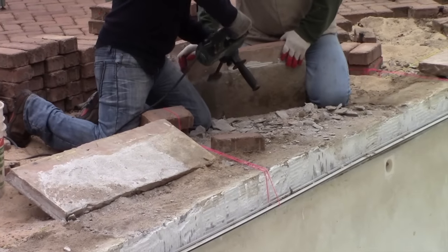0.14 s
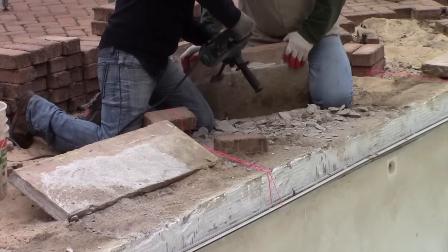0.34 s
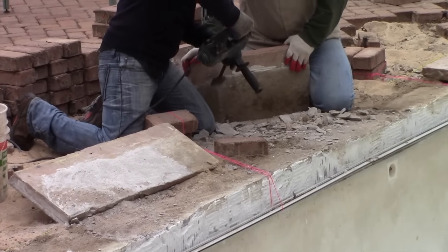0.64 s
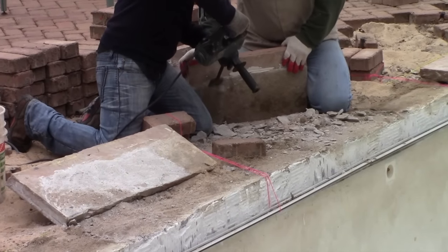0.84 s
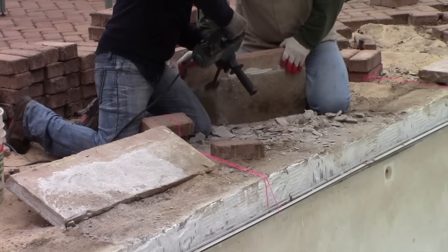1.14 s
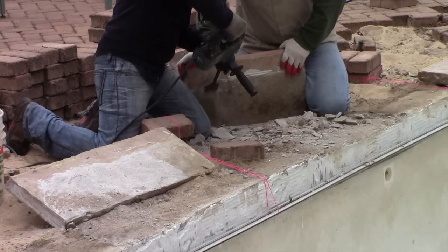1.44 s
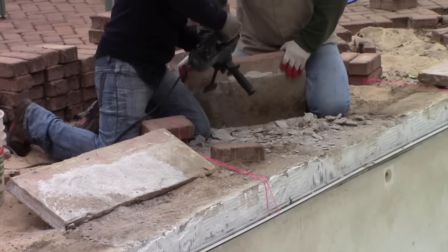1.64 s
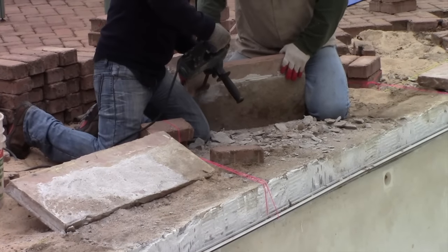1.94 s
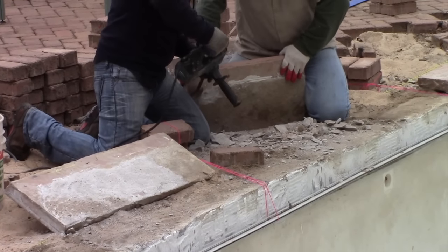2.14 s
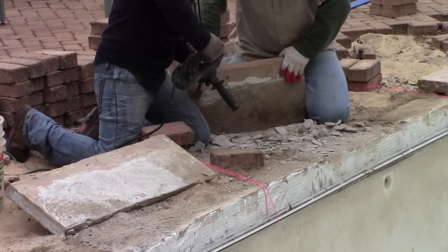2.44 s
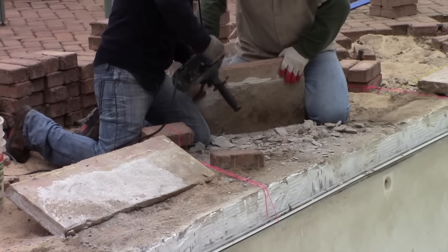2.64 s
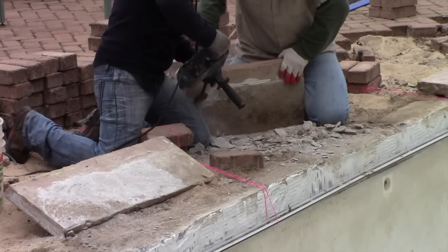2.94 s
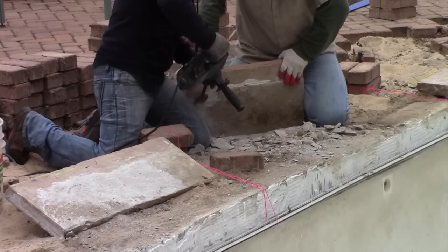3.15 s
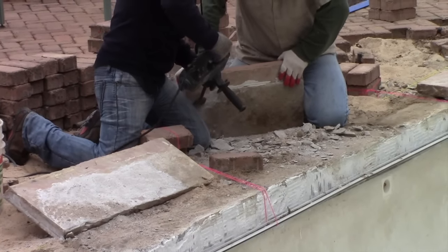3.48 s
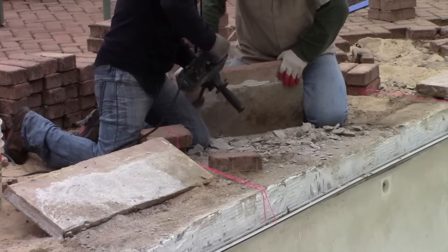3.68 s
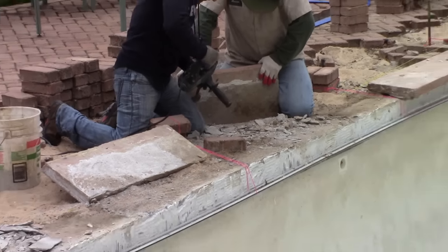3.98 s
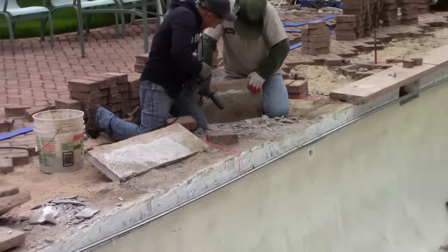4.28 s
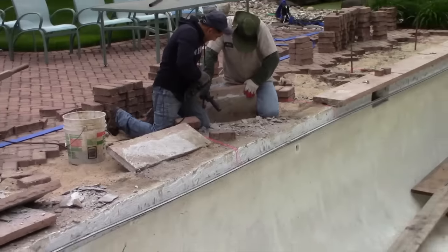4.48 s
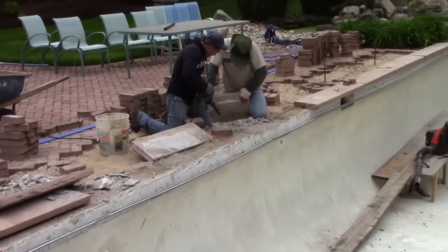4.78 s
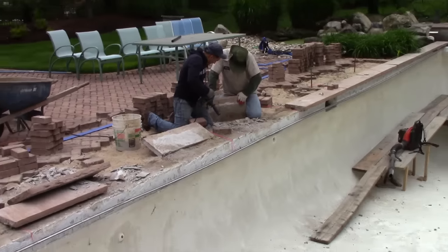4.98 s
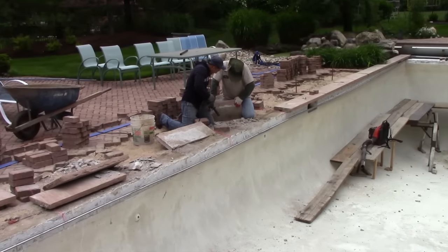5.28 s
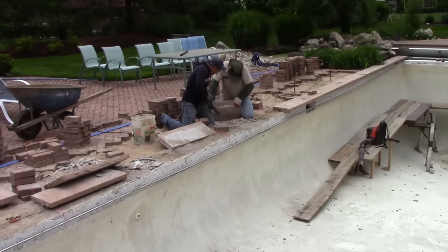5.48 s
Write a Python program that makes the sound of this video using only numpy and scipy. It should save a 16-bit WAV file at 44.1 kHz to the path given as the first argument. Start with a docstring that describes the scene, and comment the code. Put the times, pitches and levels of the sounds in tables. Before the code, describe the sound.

A dense, buzzing machine-gun rattle of steel chisel on stone, with bright gritty cracking and ticking flakes. It stops twice, each time leaving the chisel to clank and the fan and gears to whir softly before hammering restarts. Nearby stereo perspective, fairly dry open air with brief wall reflections and faint low air rumble.

```python
"""An electric chipping hammer knocks old concrete off a stone slab in three bursts, outdoors by an empty pool.
Each turn of the crank throws one blow: filtered clicks and noise make the housing knock, the stone ring,
the concrete crack and the steel chisel sing, and flakes tick on the paving.
Between bursts the tool is lifted: the chisel clangs loose, then only the fan and gears run on, as shaped noise.
Brick and pool walls add a short echo, over a faint rumble of outdoor air."""
import sys
import numpy as np
from scipy import signal
from scipy.fft import rfft, irfft
from scipy.io import wavfile
from scipy.ndimage import uniform_filter1d

SR = 44100
rng = np.random.default_rng(int(sys.argv[2]) if len(sys.argv) > 2 else 0)


def inscribe(sig):
    """Save sig as 16-bit PCM at rate SR to the path in sys.argv[1].

    A 1-D sig is mono; a 2-D sig holds one channel per row.
    Samples are clipped to [-1, 1] before scaling.
    """
    pcm = np.round(np.clip(np.atleast_2d(sig).T, -1, 1) * 32767)
    wavfile.write(sys.argv[1], SR, pcm.astype(np.int16))


N = 247838  # length in samples
TIME = np.arange(N) / SR  # seconds
TAPS = 8192  # filter size in samples
HZ = np.fft.rfftfreq(TAPS, 1 / SR)  # the frequencies at which filters are drawn
EDGE_HZ = 16100  # upper edge of the whole sound

# Bursts of hammering. Each row: start in seconds, racing above working speed in blows per second,
# pressure at the start (0-1), then the seconds at which the tool is fully pressed, the chisel seated,
# and the worker starts to ease off.
BURSTS = [(.009, 0, .68, .27, 0, 1.545), (2.3949, 3.87, 0, 2.535, 2.44, 4.64),
          (5.2441, 7.52, .2, 5.42, 5.50, 6)]
WORK_PER_S, SETTLE_S = 68.68, .27  # working speed in blows per second; racing dies away at this pace
IDLE_PER_S, COAST_S = 63, .17  # lifted, the crank slows to this many turns per second within this time
# The motor bogs down or speeds up for a moment. Each row: middle in seconds, length in seconds,
# change in blows per second.
SURGES = [(.689, .4, -.56), (5.03, .28, 6.5)]
# The chisel seats, works loose, then is lifted, in seconds; the last number curves how the worker leans in.
SEAT_S, LOOSEN_S, LIFT_S, LEAN_POWER = 0.059, .08, 0.05, 0.81
SHIFT_S = 0.11  # one bite gives way to the next over this time

# A barely touching tip. The numbers: levels in dB of knock, stone, concrete, lower and upper chisel mode,
# before each part's own trim.
TOUCH_DB = [-45.5, -45.5, -55, -77, -55]
# What a slack chisel adds, in dB, to those same five parts.
LOOSE_DB = [-1, -3.5, 1.5, 5, 2]

# Tone of the housing knock. Each row: frequency in Hz, relative level in dB.
KNOCK = [(90, -63), (140, -28), (206, -9), (272, -0.5), (420, -1), (560, -2), (800, -1.5), (1050, -14.5),
         (1600, -27)]
# Tone of the ringing stone. Each row: frequency in Hz, relative level in dB.
STONE = [(150, -32.5), (600, -36), (1100, -7.5), (1700, -2), (2600, 2), (4100, -0.5), (4800, -6),
         (6000, -5.5), (9000, -27.5)]
# Tone of the cracking concrete. Each row: frequency in Hz, relative level in dB.
CRACK = [(400, -86), (3000, -9), (6000, -5), (7200, 0), (8600, 0), (11000, -6.5), (12000, -9.5),
         (14300, -15), (16000, -28)]
# Lengthwise ringing modes of the steel chisel. Each row: frequency in Hz, width to each side in Hz.
CHISEL = [(9400, 184), (10300, 360)]

# Resonances of tool and slab for each kind of bite; widths below 90 Hz are widened to 90.
# Each row of these five: frequency in Hz, width in Hz, lift in dB.
FIRST_BITE = [(665, 110, 7.5), (940, 80, 11), (2100, 123, 15.5), (2360, 120, 2), (2976, 250, 12.5),
              (3860, 160, 8), (5200, 780, 6), (7950, 860, 7.5)]
SECOND_BITE = [(690, 53, 4.8), (990, 80, 8), (2081, 52, 13.6), (2996, 340, 10.9), (4080, 740, 5.5)]
DEEP_BITE = [(270, 84, 3.6), (733, 89, 17), (1070, 220, 11), (1520, 180, 5.6), (2300, 350, 4.7),
             (3000, 290, 5.3), (6780, 85, 11), (7600, 78, 2.7)]
EDGE_BITE = [(741.3, 87, 15.8), (2520, 65, 3.9), (2960, 160, 7.8), (4000, 64, 3.8), (5230, 136, 13.3),
             (6890, 56, 9), (8050, 420, 7.9)]
TIP_BITE = [(740.6, 87, 16), (965, 80, 6), (2950, 150, 10.8), (4570, 86, 13), (6870, 56, 12),
            (7100, 120, 3.1)]

# The tool as the two microphone ports hear it, in three postures.
# Each row of these three: frequency in Hz, left minus right level in dB.
EARLY_PORTS = [(200, -3.5), (380, -8), (700, 8), (1290, 20), (2380, 4.5), (4400, 0), (8000, 1)]
LATE_PORTS = [(200, -1.5), (380, -1), (700, -5), (1290, 10), (2380, 11.5), (4400, 1.5), (8000, 0)]
DEEP_PORTS = [(60, -1.5), (180, -0.5), (550, 23.5), (1650, 6.5), (4970, -0.5), (15000, 2.5)]
# How far the left port runs ahead. Each row: frequency in Hz, lead in radians.
LEAD = [(100, -0.4), (260, -0.084), (600, 1.13), (950, 1.05), (1380, -1.56), (2150, -1.05), (4400, -0.71),
        (6000, 0)]

# The chisel takes a new bite. Each row: start in seconds, then levels in dB at full pressure (before each
# part's own trim) of knock, stone, concrete, lower and upper chisel mode, then resonances and ports.
BITES = [ (0, -31.5, -21.5, -26.5, -35, -37, FIRST_BITE, EARLY_PORTS),
         (.9, -33, -23.7, -28, -31.5, -27, SECOND_BITE, EARLY_PORTS),
         (2.2, -22.5, -25.5, -27.5, -30, -40, DEEP_BITE, DEEP_PORTS),
         (2.78, -23.5, -24, -25, -30, -36, DEEP_BITE, DEEP_PORTS),
         (3.079, -35, -31, -32.5, -37, -39, EDGE_BITE, LATE_PORTS),
         (4.19, -34.5, -31, -34, -34.5, -30, TIP_BITE, LATE_PORTS),
         (5.0, -28.5, -26.5, -30, -36, -31.5, TIP_BITE, LATE_PORTS), ]

# The slack chisel slams into its holder. Each row: time in seconds, strength in dB before a shared trim,
# ring frequency in Hz, relative level in dB of the stone struck with it.
CLANGS = [(1.598, -11, 10400, -7), (1.6132, -25, 9510, -20), (1.6286, -4, 9900, -10),
          (4.681, -12, 9600, -23), (4.709, -12, 9900, -4.5), (5.392, -6, 10200, -12),
          (5.4041, -3.5, 10300, -11), (5.4352, -5, 10100, -13), (5.447, -12, 10200, 5.5),
          (5.4602, -11.5, 10100, 4)]

# Tone of fan and gears. Each row: frequency in Hz, relative level in dB.
MOTOR = [(100, -27), (230, -16), (330, -5), (430, -14), (600, 1), (1000, -4), (2200, 3.5), (4000, -0.5),
         (5200, -3.5), (8500, -2.5), (16000, -24)]
# Balance of the motor between the ports. Each row: frequency in Hz, left minus right level in dB.
MOTOR_SIDE = [(200, -1.5), (380, 1.5), (700, 12), (1290, 16.5), (2380, 6), (4400, .5), (8000, 0)]
# Likeness of the motor noise in both ports. Each row: frequency in Hz, likeness (1 is identical).
MOTOR_SAME = [(130, 1), (300, 0.75), (1400, 0.91), (3100, 0.44), (6000, 1)]

# Tone of the outdoor rumble. Each row: frequency in Hz, relative level in dB.
AIR = [(20, -36), (50, -22), (90, -1.5), (170, 1.5), (260, -1.5), (500, -23)]
# Soft low bumps of air on the microphone. Each row: middle in seconds, level in dB, length in seconds.
BUMPS = [(0.535, -48.5, 0.092), (.68, -49.5, .07), (2.25, -57.5, 0.42), (2.544, -43, 0.13),
         (2.807, -48, 0.18), (3.033, -39, 0.12), (3.483, -52, 0.091), (4.36, -55, 0.1), (5.299, -40, 0.072),
         (5.478, -50, 0.036)]


def hammer(turns, pressure, slack):
    """Housing, stone, concrete and chisel answer each blow; each new bite of the chisel shifts the colour."""
    trains = strikes(turns, pressure, slack)
    out = np.zeros((2, N))
    for share, (*_, resonances, side) in zip(bite_shares(), BITES):
        knock, stone, crack = trains[:3] * share ** .7
        lift_db = sum(db / (1 + (2 * (HZ - hz) / max(width, 90)) ** 2) for hz, width, db in resonances)
        sound = amp(-0.82) * part(knock, read(KNOCK) + lift_db, rough=0.012, decay_s=0.0099,
                                  direct=0.68, echo_s=.007)
        sound += amp(0.33) * part(stone, read(STONE) + lift_db, rough=0.051, decay_s=0.0046,
                                  direct=1.1, creep_hz=0.583)
        sound += amp(2.47) * part(crack, read(CRACK) + lift_db, rough=0.28, decay_s=0.004,
                                  direct=0.69, creep_hz=1.311)
        out += ports(sound, read(side), read(LEAD))
    for blows, (hz, width) in zip(trains[3:], CHISEL):
        # one signal, added equally to both ports
        out += part(blows, mode_db(hz, width), rough=0.83, decay_s=0.0014, direct=0.99, creep_hz=2.5)
    return out + chips(trains[2])


def strikes(turns, pressure, slack, jitter_s=.00002, slack_s=.0006, knock_db=0.05, uneven_db=0.69, steel_db=0.5):
    """One blow per crank turn, harder with pressure, ragged when slack: a row of clicks for each of five parts."""
    new_turn = np.diff(np.floor(turns)) > 0
    due = np.flatnonzero(new_turn & (pressure[1:] > 0)) + 1
    press, loose = pressure[due, None], slack[due, None]
    chance = rng.standard_normal((len(due), 6))
    bite_db = bite_shares()[:, due].T @ np.array([row[1:6] for row in BITES])
    level_db = press * bite_db + (1 - press) * TOUCH_DB + loose * LOOSE_DB
    level_db += chance[:, :5] * [knock_db, uneven_db, uneven_db, steel_db, steel_db]
    late_s = (jitter_s + slack_s * slack[due]) * chance[:, 5]  # early when negative
    at = np.clip(due + np.round(late_s * SR).astype(int), 0, N - 1)
    trains = np.zeros((5, N))
    trains[:, at] = amp(level_db).T
    return trains * np.sqrt(SR / WORK_PER_S)  # each blow carries the energy of a whole turn


def crank():
    """Speed and turns of the crank: it races at the start of a burst, settles under load, coasts when lifted."""
    surge = sum(change * np.exp(-(2 * (TIME - s) / length) ** 2) for s, length, change in SURGES)
    speed = np.full(N, WORK_PER_S)
    turns = WORK_PER_S * (TIME - BURSTS[0][0])
    for start, race, *_, eased in BURSTS:
        on = TIME >= start
        coast = (IDLE_PER_S - WORK_PER_S) * ramp(eased, COAST_S)
        speed[on] = (WORK_PER_S + surge + coast)[on]
        speed[on] += race * np.exp((start - TIME[on]) / SETTLE_S)
        turns[on] = np.ceil(turns[~on][-1]) + np.cumsum(speed[on]) / SR
    return speed, turns


def grip():
    """Pressure on the tool and slack of the chisel, 0-1: the worker leans in, holds, eases off and lifts."""
    pressure, slack = np.zeros((2, N))
    for start, _, first, pressed, seated, eased in BURSTS:
        on = TIME >= start
        lean = first + (1 - first) * ramp(start, pressed - start) ** LEAN_POWER
        lift = ramp(eased + LOOSEN_S, LIFT_S)
        pressure[on] = (lean * (1 - lift))[on]
        slack[on] = (1 - ramp(seated - SEAT_S, SEAT_S) + ramp(eased, LOOSEN_S))[on]
    return pressure, slack


def bite_shares():
    """How much of each bite is heard at each moment; the shares sum to 1."""
    later = [ramp(row[0] - SHIFT_S / 2, SHIFT_S) for row in BITES[1:]]
    begun = [np.ones(N)] + later + [np.zeros(N)]
    return -np.diff(begun, axis=0)


def part(blows, db, rough, decay_s, direct, echo_s=.0011, creep_hz=0):
    """Blows sound a spectrum: one share repeats, the rough share is a fresh puff of crumbling each time."""
    rough = np.clip(rough, 0, 1)
    fade = unit(np.exp(-np.arange(TAPS // 4) / SR / decay_s))
    puffs = np.sqrt(abs(through(blows ** 2, fade ** 2))) * rng.standard_normal(N)
    # as the tip creeps over the stone, the rattle drifts between two patterns at constant energy
    here, there = scatter(decay_s, direct, echo_s), scatter(decay_s, direct, echo_s)
    moved = np.sin(np.pi * creep_hz * TIME) ** 2
    blows = blows / np.sqrt(1 - 2 * moved * (1 - moved) * (1 - here @ there))
    rattle = through(blows * (1 - moved), here) + through(blows * moved, there)
    mixed = np.sqrt(1 - rough) * rattle + np.sqrt(rough) * puffs
    return through(mixed, causal(db))


def scatter(decay_s, direct, echo_s, echo=0.45, count=6):
    """A sharp front, a weaker copy after echo_s (a bounce off the slab, or for the housing knock the piston's
    return stroke) and a few milliseconds of rattle, nearly even in spectrum."""
    t = np.arange(TAPS // 4) / SR
    h = unit(rng.standard_normal(len(t)) * np.exp(-t / decay_s))
    h[0] += direct
    h[round(echo_s * SR)] += echo * direct
    for _ in range(count):  # repeatedly even out the spectrum, then cut the tail short
        z = rfft(h, TAPS)
        h = irfft(z / abs(z))[:len(t)] * (t < 5 * decay_s)
    return unit(h)


def chips(blows, per_s=200, level_db=-16, spread=1.0):
    """Flakes thrown off by the blows tick on the paving, more loudly when the concrete cracks harder."""
    effort = np.sqrt(abs(uniform_filter1d(blows ** 2, SR // 20)))
    ticks = (rng.random(N) < per_s / SR) * rng.rayleigh(1, N)
    ticks = amp(level_db) * effort * unit(ticks) * np.sqrt(N)
    pan = spread * rng.uniform(-2.04, 1, N)  # leans to the right
    flake = through(scatter(0.0013, 0.65, .0004), causal((read(STONE) + read(CRACK)) / 2))
    return np.array([through(ticks * (1 + side * pan), flake) for side in (1, -1)])


def clangs(decay_s=0.0059, width_hz=600, splash_db=-3, stone_db=-1, body_hz=750, body_width_hz=170,
           body_db=-8, level_db=-7.5):
    """With nothing to bite on, the chisel takes the whole blow and rings; it may glance off the slab."""
    out, t = np.zeros(N), np.arange(TAPS // 2) / SR
    body = causal(mode_db(body_hz, body_width_hz))
    glance = amp(stone_db) * causal(read(STONE)) + amp(body_db) * body
    splash = amp(splash_db) * causal(read(CRACK))
    for s, strength_db, hz, glance_db in CLANGS:
        burst = rng.standard_normal(len(t)) * np.exp(-t / decay_s)
        colour = causal(mode_db(hz, width_hz)) + splash + amp(glance_db) * glance
        span = out[round(s * SR):][:len(t)]  # a view: adding to it adds to out
        span += amp(strength_db + level_db) * through(burst, colour)[:len(span)]
    return out


def motor(speed, turns, pressure, idle_db=-34.5, db_per_speed=0.85, loaded_db=-6, throb_db=-2, return_db=0.8,
          grit_db=2.0):
    """Fan rush and gear rattle: louder with speed, quieter under load, swelling with both piston strokes."""
    left, other, grit = rng.standard_normal((3, N))
    # the right noise shares part of the left noise, by frequency
    same = np.clip(read(MOTOR_SAME, np.fft.rfftfreq(N, 1 / SR)), -1, 1)
    right = irfft(same * rfft(left) + np.sqrt(1 - same ** 2) * rfft(other), N)
    stroke_db = throb_db * np.cos(2 * np.pi * (turns - .15))
    stroke_db += return_db * np.cos(4 * np.pi * (turns - .35))
    rattle = amp(stroke_db + grit_db * through(grit, unit(np.hanning(64))))
    colour = causal(read(MOTOR))
    pair = np.array([through(side * rattle, colour) for side in (left, right)])
    pair = ports(pair, read(MOTOR_SIDE), 0)
    level_db = idle_db + db_per_speed * (speed - IDLE_PER_S) + loaded_db * pressure
    return amp(uniform_filter1d(level_db, SR // 10)) * pair / pair.mean(0).std()


def yard(x, t60=0.11, treble_t60=0.24, delay_s=0.0082, wet_db=-13, treble_db=-12):
    """Brick stacks and pool walls return a short, thin tail; its treble is nearly alike in both ports."""
    t = np.arange(SR // 2) / SR
    sparse = rng.standard_normal((3, len(t))) * (rng.random((3, len(t))) < 2000 / SR)
    left, right, shared = sparse * (t > delay_s)
    middle = signal.butter(2, [700, 5000], "bandpass", fs=SR, output="sos")
    top = signal.butter(2, 4500, "high", fs=SR, output="sos")
    out = []
    for side, taps in zip(x, (left, right)):
        body = unit(taps * amp(-60 * t / t60))  # falls 60 dB in t60 seconds
        treble = unit((shared + 0.08 * taps) * amp(-60 * t / treble_t60))
        tail = amp(wet_db) * signal.sosfilt(middle, body) + amp(treble_db) * signal.sosfilt(top, treble)
        out.append(through(side, tail))
    return np.array(out)


def air(calm_db=-68.0, apart=0.24):
    """A faint outdoor rumble of low noise with soft bumps, a little different in each port."""
    bumps = sum(amp(db) * np.exp(-(2 * (TIME - s) / length) ** 2) for s, db, length in BUMPS)
    level = amp(calm_db) + bumps
    both, side = (through(noise, causal(read(AIR))) for noise in rng.standard_normal((2, N)))
    return level * np.array([both + apart * side, both - apart * side])


def ports(x, side_db, lead):
    """Left and right gain and phase by frequency, keeping the level of their mean."""
    half = amp(side_db / 2) * np.exp(.5j * lead)
    pair = np.array([half, 1 / half]) / np.maximum(abs(half + 1 / half) / 2, .5)
    h = np.fft.fftshift(irfft(pair), axes=1)
    wide = signal.oaconvolve(np.broadcast_to(x, (2, N)), h, axes=1)
    return wide[:, TAPS // 2:][:, :N]  # take off the filter's delay


def mode_db(hz, width):
    """One resonance with steep skirts, 6 dB down at the given width to each side."""
    return -20 * np.log10(1 + ((HZ - hz) / width) ** 2)


def causal(db):
    """Turns a spectrum in dB into a filter of energy 1 that never sounds before its cause."""
    log_gain = np.log(amp(np.maximum(db, db.max() - 100)))
    circle = np.r_[log_gain, log_gain[-2:0:-1]]
    minimum_phase = np.exp(np.conj(signal.hilbert(circle)))[:len(HZ)]
    return unit(irfft(minimum_phase)[:TAPS // 2])


def through(x, h):
    """Passes x through the filter h."""
    return signal.oaconvolve(x, h)[:len(x)]


def read(points, hz=HZ):
    """Joins the points of a table by straight lines on a log-frequency axis."""
    f, value = np.transpose(points)
    return np.interp(np.log(hz + 1), np.log(f + 1), value)


def ramp(start, length):
    """Rises from 0 to 1 in a straight line; start and length in seconds."""
    return np.clip((TIME - start) / length, 0, 1)


def unit(h):
    """Scales a filter or signal to energy 1."""
    return h / np.linalg.norm(h)


def amp(db):
    """Decibels to gain."""
    return 10 ** (np.asarray(db) / 20)


def scene():
    """The crank and the worker's grip drive blows and motor noise together."""
    speed, turns = crank()
    pressure, slack = grip()
    tool = hammer(turns, pressure, slack) + clangs()
    return tool + yard(tool) + motor(speed, turns, pressure) + air()


def record(dry):
    """Clips at full scale, then removes what lies above the upper edge."""
    low_pass = signal.firwin(511, EDGE_HZ, window=("kaiser", 9), fs=SR)
    return signal.oaconvolve(np.clip(dry, -1, 1), low_pass[None], "same")


dry = scene()
out = record(dry)
inscribe(out)
```